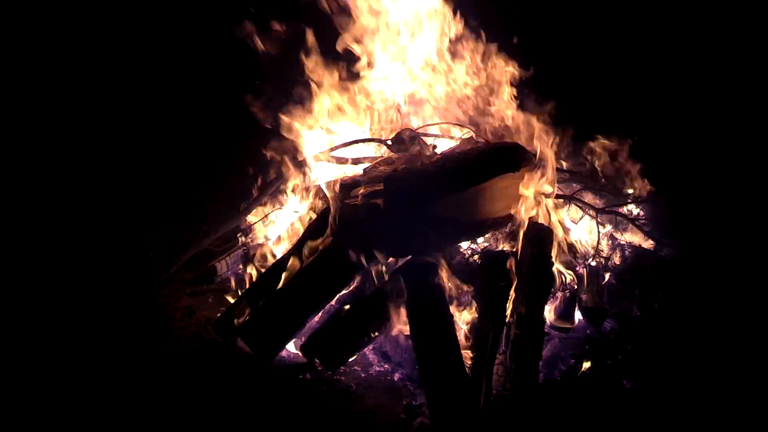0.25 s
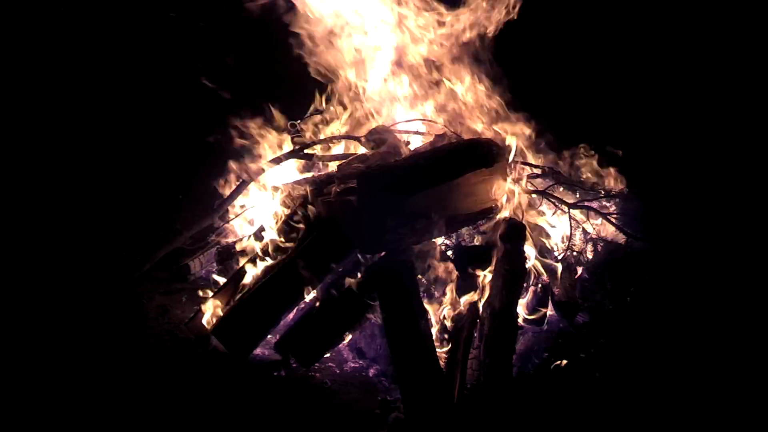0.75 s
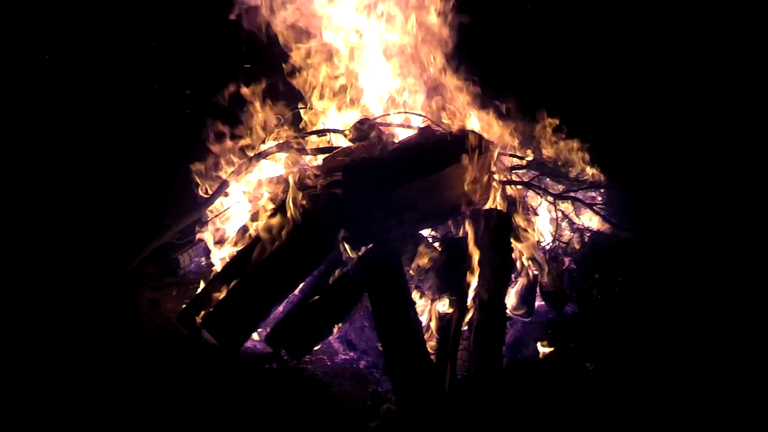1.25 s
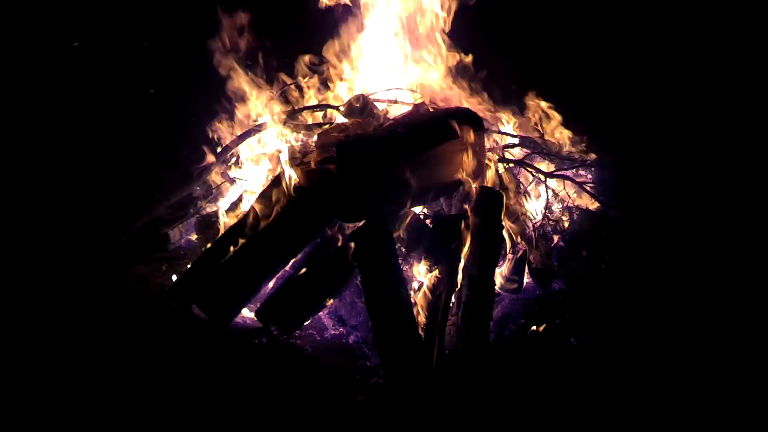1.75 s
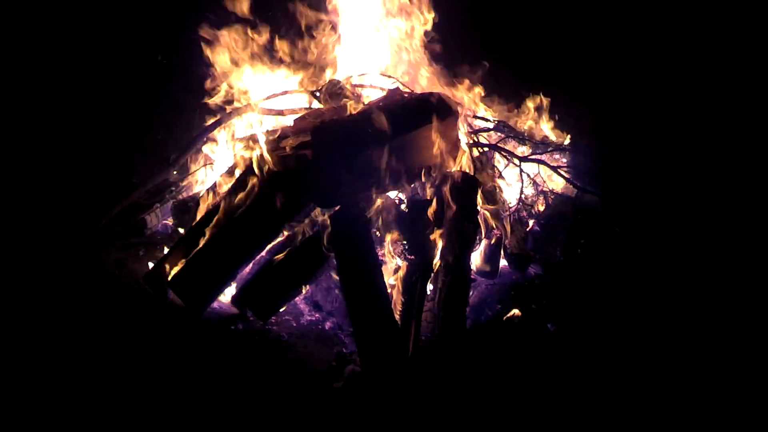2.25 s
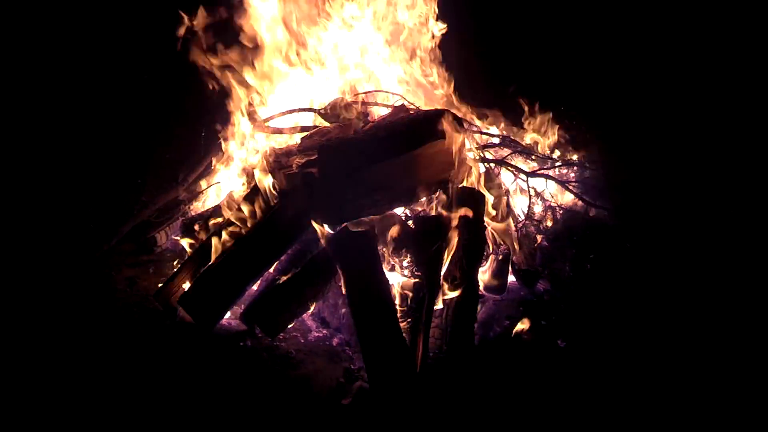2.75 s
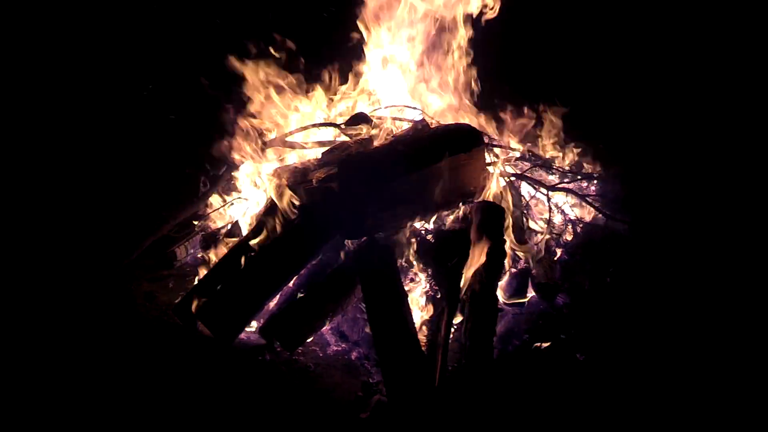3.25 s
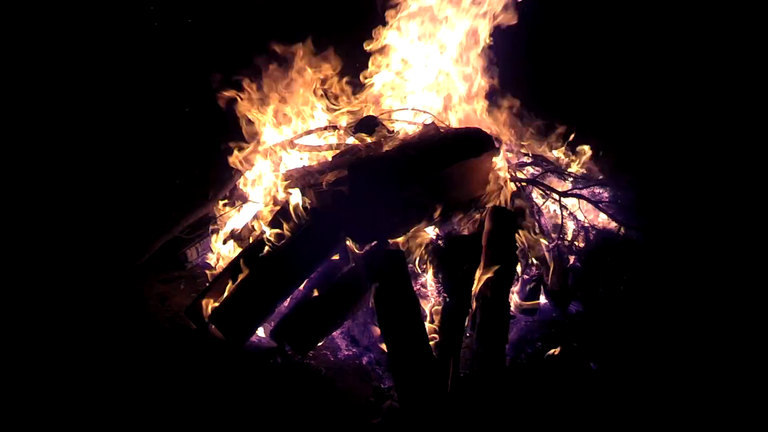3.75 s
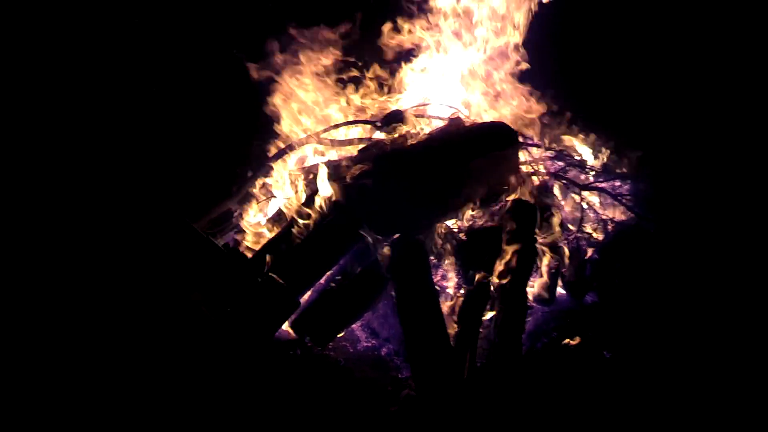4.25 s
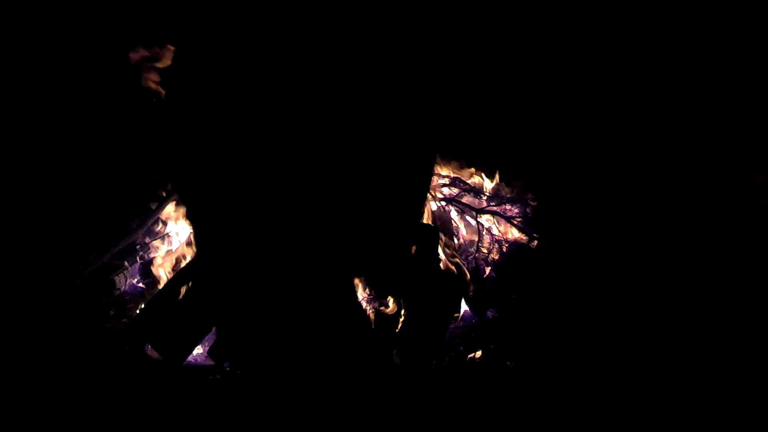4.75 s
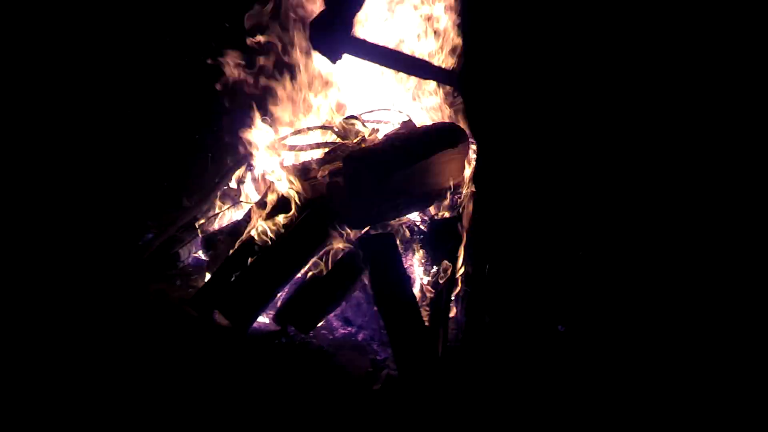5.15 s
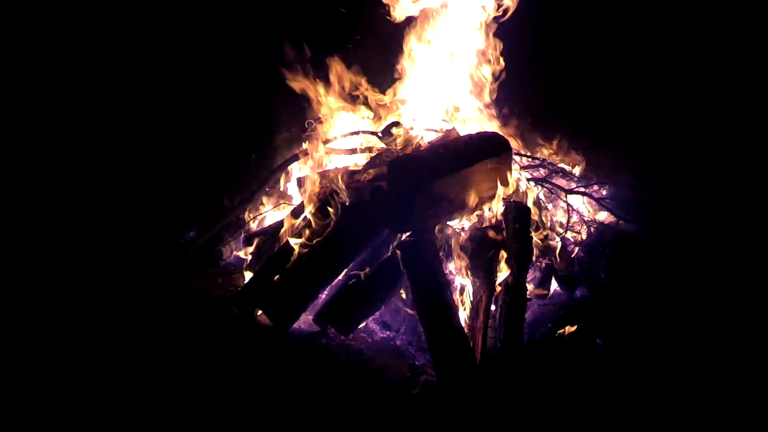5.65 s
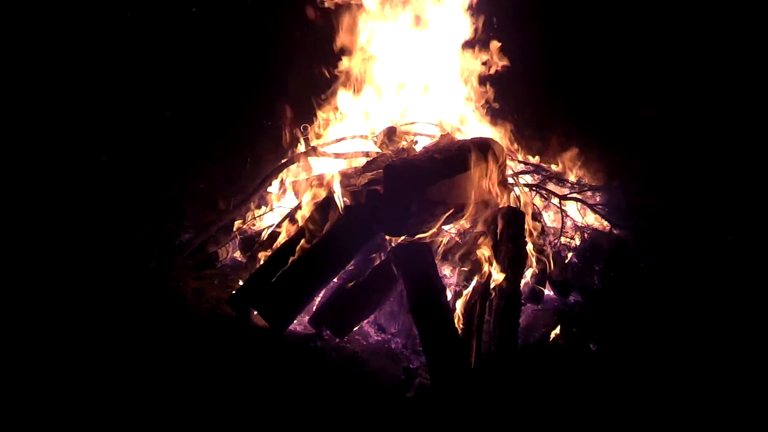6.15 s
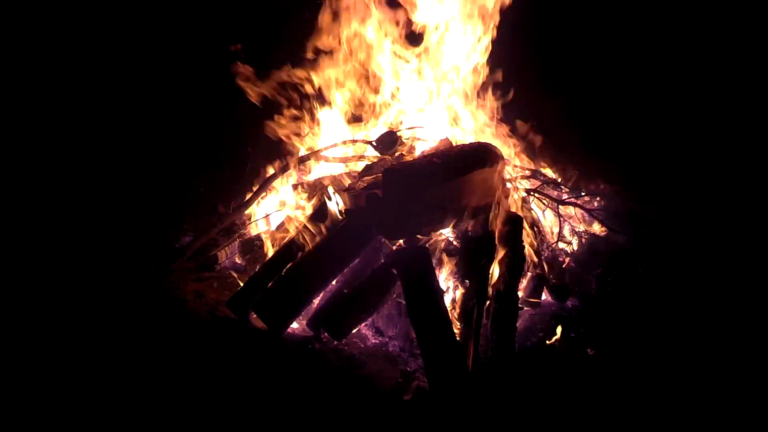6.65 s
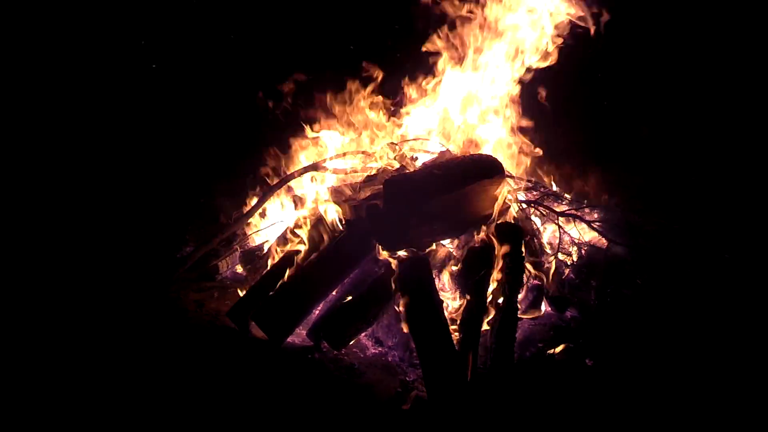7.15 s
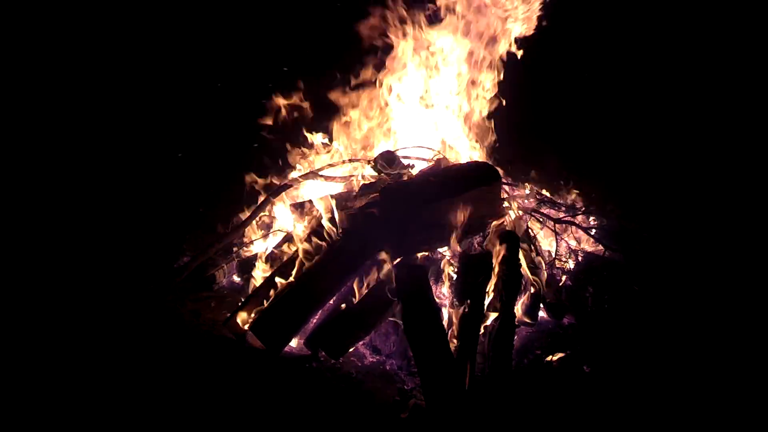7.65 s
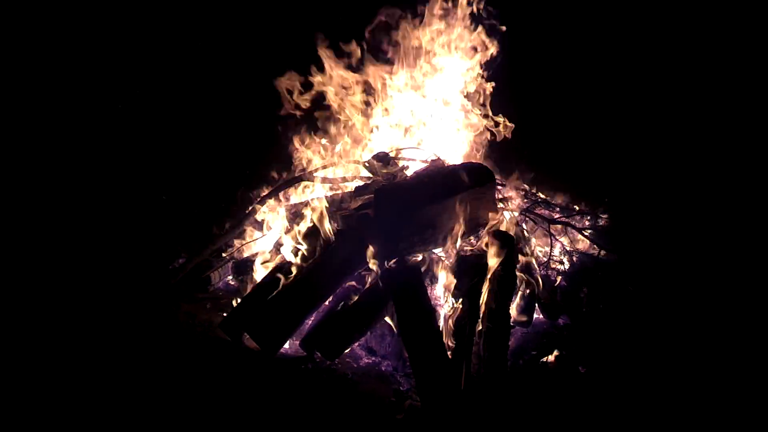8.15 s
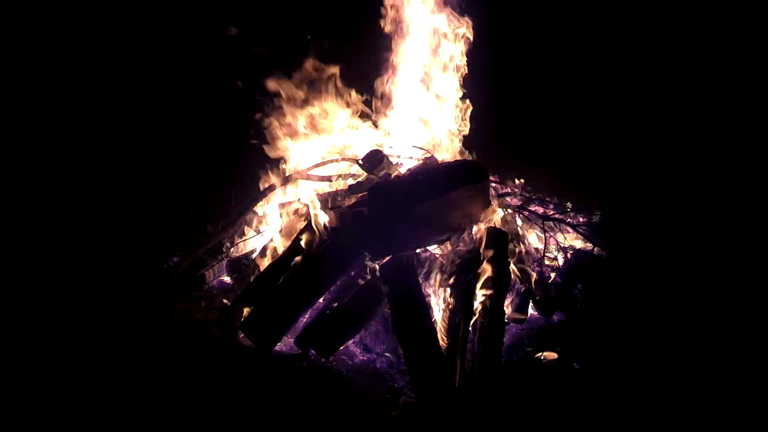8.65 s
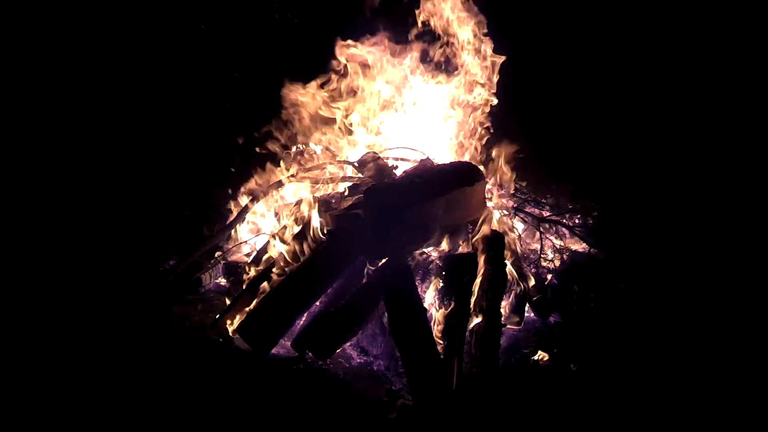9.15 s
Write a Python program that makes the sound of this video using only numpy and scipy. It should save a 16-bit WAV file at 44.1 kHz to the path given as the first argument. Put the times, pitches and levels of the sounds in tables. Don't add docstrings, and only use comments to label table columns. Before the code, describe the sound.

Close by a large outdoor wood fire at night, dense irregular crackle runs over hiss and a soft low roar. Branches crack and sap spits; a loud bang around three seconds briefly lowers the level. Paired bangs come near six seconds, then wind flutters heavily against one side of the stereo microphone around seven to eight, with crackling throughout.

```python
import sys
import numpy as np
from scipy import signal
from scipy.fft import next_fast_len
from scipy.io import wavfile

SR = 44100
rng = np.random.default_rng(int(sys.argv[2]) if len(sys.argv) > 2 else 0)


def voltage_ratio(decibels):
    exponent = np.asarray(decibels, float) / 20
    return 10 ** exponent


def log_audio(samples):
    frames = np.atleast_2d(samples).T
    limited = np.clip(frames, -1, 1)
    pcm = np.round(limited * 32767).astype(np.int16)
    wavfile.write(sys.argv[1], SR, pcm)


N = 413658


def at_time(rows):
    t_s, level_db = np.transpose(rows)
    return np.interp(np.arange(N) / SR, t_s, level_db)


def every_sample(slow):
    return np.interp(np.arange(N) / 40, np.arange(len(slow)), slow)


def rms_one(x):
    return x / np.sqrt(np.mean(x ** 2) + 1e-20)


def band(x, low_hz, high_hz):
    return signal.sosfilt(signal.butter(2, [low_hz, min(high_hz, SR * .45)], "band", fs=SR, output="sos"), x)


def split_filter(x, order, turn_hz, kind):
    return signal.sosfilt(signal.butter(order, turn_hz, kind, fs=SR, output="sos"), x)


def drift(rate):
    pole = np.exp(-80 * np.pi * rate / SR)
    settling = 2000
    white = rng.standard_normal(N // 40 + 2 + settling)
    return rms_one(signal.lfilter([1], [1, -2 * pole, pole * pole], white)[settling:])


def flicker_noise(spectrum, shared_db, own_db, rate):
    hz, level_db = np.transpose(spectrum)
    edges = hz[0] * 2 ** np.arange(0, np.log2(hz[-1] / hz[0]) + .01, .5)
    white = rng.standard_normal((2, N))
    together = drift(rate)
    out = 0
    for k, (low, high) in enumerate(zip(edges, edges[1:])):
        colour_db = np.interp(np.log(low * high) / 2, np.log(hz), level_db)
        gain = voltage_ratio(colour_db + shared_db * together + own_db * drift(rate))
        out = out + every_sample(gain) * band(white[k % 2], low, high)
    return rms_one(out)


def place(times, shapes):
    out = np.zeros(N + shapes.shape[1])
    starts = np.round(times * SR).astype(int)[:, None]
    np.add.at(out, starts + np.arange(shapes.shape[1]), shapes)
    return out[:N]


def ducking_db():
    # t/s, drop/dB
    ducks = [
        (1, 5),
        (3.002, 8),
        (6.109, 7),
        (8.449, 3),
    ]
    recovery_s, attack_s = 1.41, 0.0092
    t = np.arange(N) / SR
    gain_db = np.zeros(N)
    for start_s, drop_db in ducks:
        since = np.maximum(t - start_s, 0)
        gain_db -= drop_db * np.exp(-since / recovery_s) * (1 - np.exp(-since / attack_s))
    return gain_db


def flame_levels_db():
    # t/s, level/dB
    flames = [(0.0, -59), (0.52, -59), (0.98, -53), (1.3, -53.5), (1.56, -55.5), (2.3, -56), (2.6, -58.5),
              (2.9, -55), (3.5, -57.5), (3.9, -54.5), (4.7, -57), (5.1, -54.5), (5.21, -50.5),
              (5.33, -52.5), (6.1, -49), (7.0, -56), (8.4, -55), (9.38, -59.5)]
    vigour_db = at_time(flames)
    mean_db = vigour_db.mean()
    duck_db = ducking_db()
    return vigour_db + 1 + duck_db, mean_db + 0.99 * (vigour_db - mean_db) + duck_db


def wind_eddies():
    # t/s, peak level/dB,
    # sharpness level/dB
    puffs = [(2.388, -20.5, -15), (2.526, -26, -28), (2.664, -24.5, -13.5), (2.7, -19.5, -13),
             (2.734, -18, -11.5), (2.794, -22.5, -25), (4.554, -26, -10.5), (4.746, -27, -16),
             (4.97, -42, -16), (5.027, -19, -11.5), (5.185, -31, -32), (5.232, -22, -22), (5.354, -17, -35),
             (5.503, -26, -12), (6.452, -22, -34), (6.548, -37, -23.1), (6.699, -24.5, -23),
             (6.966, -28.5, -30), (8.32, -22.5, -20), (8.424, -23.5, -15), (8.657, -24, -18.5),
             (8.743, -27, -26), (8.8, -32, -24), (9.014, -32.5, -1.5), (9.04, -38, -17), (9.151, -19, -16),
             (9.354, -23, -16),
             (7.243, -23, -11.5), (7.318, -17.5, -21), (7.376, -22, -13.5), (7.439, -20.5, -15),
              (7.525, -20, -8), (7.586, -21.5, -37), (7.63, -22, -13.5), (7.733, -16.5, -44),
              (7.777, -21.5, -38), (7.83, -24, 0), (7.915, -20.5, -24), (7.975, -9.5, -35),
              (8.028, -22.5, -22), (8.091, -18.5, -22), (8.148, -14, -15.5), (8.209, -20.5, -21),
             (3.901, -46, 0), (4.005, -42, -30), (4.573, -28, -6.5), (4.602, -30, -25), (5.068, -26, -21),
             (5.3862, -22, -27), (6.392, -30, -20), (6.6033, -28, -26), (6.84, -22, -23), (7.021, -33, -31),
             (7.09, -28, -15), (7.262, -23, -15), (7.397, -29, -15), (7.498, -21.5, -14), (7.564, -30, -20),
             (7.651, -37, -22), (7.75, -21, -15), (8.366, -27, -11), (8.389, -23, -19), (8.547, -35, -28),
             (8.959, -45, -24)]
    centre_s, peak_db, sharp_db = np.transpose(puffs)
    t = np.arange(2600) / SR
    swirl = rng.standard_normal((len(centre_s), len(t))) * (t / 0.0078) ** 0.89 * np.exp(-t / 0.0098)
    swirl[:, 500] -= 18
    swing = band(band(swirl, 45, 230), 40, 280)
    core = np.exp(-((t - .012) / .0035) ** 2)
    edge = band(band(swirl * core, 200, 520), 180, 560)
    swing = swing / np.abs(swing).max(axis=1, keepdims=True)
    edge = edge / np.abs(edge).max(axis=1, keepdims=True)
    eddies = voltage_ratio(peak_db)[:, None] * (swing + voltage_ratio(sharp_db + 5.0)[:, None] * edge)
    return place(centre_s - .016, eddies)


def wind():
    # t/s, level/dB
    gusts = [(0.0, -22.5), (0.16, -55), (1.5, -69), (2.2, -57), (2.45, -38), (2.75, -26.5), (3.1, -72),
             (4.35, -61), (4.62, -30.5), (4.8, -60), (5.0, -27.5), (5.35, -35), (5.65, -41), (6.25, -52),
             (6.5, -38.5), (7.5, -38.5), (8.9, -38.5), (9.15, -29)]
    # f/Hz, level/dB per Hz
    buffet_spectrum = [(21, 18), (76, -1), (144, 4.5), (207, -22), (302, -4.5), (432, -32), (832, -25),
                       (1500, -67)]
    front_db = -14
    lumps = flicker_noise(buffet_spectrum, shared_db=6.0, own_db=4.0, rate=54)
    buffet = voltage_ratio(at_time(gusts) - 3.5) * np.array([voltage_ratio(front_db) * lumps[::-1], lumps])
    return buffet + wind_eddies() * [[voltage_ratio(front_db - 9.5)], [1]]


def rumble(roar_db):
    # f/Hz, level/dB per Hz
    rumble_spectrum = [(30, 3), (60, -15.5), (110, 4.5), (200, 3.5), (330, -5), (600, -84)]
    noise = flicker_noise(rumble_spectrum, shared_db=0.5, own_db=3.0, rate=4.05)
    return band(voltage_ratio(roar_db + 12.5) * noise, 61, 3000)


def roar(roar_db):
    # f/Hz, level/dB per Hz
    roar_spectrum = [(300, 3), (500, -2), (800, -1.5), (1500, -7), (2500, -1.5), (4000, -77)]
    return voltage_ratio(roar_db + 1.5) * flicker_noise(roar_spectrum, shared_db=2.0, own_db=2.5, rate=21.5)


def hiss(hiss_db):
    # f/Hz, level/dB per Hz
    hiss_spectrum = [(1500, 6), (2500, -12.5), (4500, 4.5), (7000, -11), (10000, -2), (13000, -10.5),
                     (17000, 8.5)]
    sizzle = flicker_noise(hiss_spectrum, shared_db=1.4, own_db=.8, rate=30)
    front = voltage_ratio(hiss_db - 11.0) * sizzle
    rear_own = voltage_ratio(hiss_db + 0.5) * band(sizzle[::-1], 4000, 20000)
    return front, rear_own


def shifts():
    # t/s, length/s, level/dB, low f/Hz, high f/Hz
    rubs = [
        (1.717, 0.028, -41, 200, 626),
        (3.888, 0.019, -41.5, 219, 540),
        (5.189, 0.076, -44, 607, 1770),
        (5.198, 0.062, -36.5, 230, 670),
        (6.995, 0.019, -34, 267, 400),
        (9.229, 0.014, -52, 606, 1200),
    ]
    out = np.zeros(N)
    t = np.arange(5000) / SR
    for start_s, length_s, level_db, low_hz, high_hz in rubs:
        clumps = voltage_ratio(5.0 * np.repeat(rng.standard_normal(50), 100))
        grit = rng.standard_normal(len(t)) * clumps
        swell = np.sin(np.pi * np.clip(t / length_s, 0, 1)) ** .5
        rub = rms_one(band(grit, low_hz, high_hz)) * swell
        out += place(np.array([start_s]), voltage_ratio(level_db) * rub[None])
    return out


def rings():
    # t/s, pitch f/Hz, level/dB, t60/ms
    modes = [(0.9630, 1440, -25, 7.7), (1.1325, 2900, -51, 5), (1.5802, 2900, -41, 5),
             (1.9146, 2900, -37, 6.5), (2.7983, 403, -31.5, 24), (2.8253, 2900, -17.5, 2),
             (2.9969, 2210, -11, 2.9), (3.2137, 910, -32.5, 6), (3.5538, 2900, -40, 6),
             (4.0855, 1040, -30.5, 6), (4.1413, 710, -30.5, 8.5), (5.5555, 950, -28, 7.1),
             (6.1046, 1840, -24.5, 5.5), (6.1049, 680, -10.5, 2.6), (6.4838, 1570, -23, 9.5),
             (6.5832, 1670, -32.5, 8.4), (8.0751, 1650, -26, 7.8), (8.7842, 1670, -29.5, 7.8),
             (9.1736, 1620, -49, 9), (9.2332, 865, -33, 13)]
    start_s, pitch_hz, level_db, t60_ms = np.transpose(modes)[:, :, None]
    t = np.arange(1300) / SR
    decay = voltage_ratio(level_db + 3.0 - 60000 * t / np.clip(t60_ms, 2, 30))
    return place(start_s[:, 0], decay * np.sin(2 * np.pi * pitch_hz * t))


def bursts(times, parts_db, length_s, crack, tail_db):
    # low f/Hz, high f/Hz, level/dB
    burst_bands = [
        (623, 2780, 0.5),
        (1764, 5040, 0.5),
        (6790, 14900, 1.5),
        (12100, 18500, -4.5),
    ]
    t = np.arange(500) / SR
    length_s = length_s[:, None]
    tear = (1 - np.exp(-t / (.1 * length_s))) * np.exp(-t / (.7 * length_s))
    envelope = tear + voltage_ratio(tail_db) * np.exp(-t / .003)
    tearing = rng.standard_normal((len(times), len(t))) * envelope
    tearing[:, 2:5] -= crack * .001 / length_s
    shapes = 0
    for (low_hz, high_hz, port_db), level_db in zip(burst_bands, parts_db):
        part = band(tearing, low_hz, high_hz)
        strength = np.sqrt((part ** 2).sum(axis=1, keepdims=True) / 44)
        shapes = shapes + part / strength * voltage_ratio(level_db + port_db)[:, None]
    return place(times, shapes)


def crackle(hiss_db):
    rate_per_s = every_sample(220 * voltage_ratio(4.5 * drift(6)))
    born = np.flatnonzero(rng.random(N) < rate_per_s / SR)
    chance = rng.standard_normal((8000, 7))[:len(born)].T
    spread = np.minimum(chance[5] ** 2 + chance[6] ** 2, 2.1)
    size_db = hiss_db[born] + 0.5 + 2.7 * spread
    colour_db = 2.4 * chance[:4] + [[-5.0], [-2.5], [-4.5], [-4.0]]
    colour_db[2] += 3 * np.exp(-born / SR / 1)
    length_s = .0004 * voltage_ratio(4.5 * chance[4])
    return bursts(born / SR, size_db + colour_db, length_s, crack=1.4, tail_db=-22)


def pops():
    # t/s, knock level/dB, snap level/dB, spit level/dB, length/ms
    bangs = [(0.0335, -35, -35, -25.5, 2.1), (0.9631, -39, -30.5, -27, 3), (1.1322, -34.5, -32, -24.5, 1.5),
             (1.581, -58, -23.5, -26, 1.9), (1.9145, -18, -18.5, -24.5, 2.3),
             (2.4285, -42, -30.5, -24, 0.7), (2.7977, -27, -44, -30.5, 7.4), (2.825, -35, -36, -29, 4.1),
             (2.9967, -8, -12, -50, 0.63), (3.5536, -38, -31, -26.5, 1.6), (4.0856, -29, -23, -24, 1.1),
             (4.1403, -30.5, -47, -25.5, 2.7), (5.5435, -37, -28, -58, 1.8),
             (5.5553, -33, -30, -27.5, 0.41), (6.0978, -27, -31, -31, 4.7), (6.1044, -17, -14.5, -21, 1.1),
             (6.4836, -53, -54, -28, 0.67), (6.583, -31, -19.5, -25.5, 0.3),
             (6.8166, -38, -24.5, -24.5, 0.24), (8.0747, -31, -21.5, -33, 0.84),
             (8.4446, -36, -26, -24, 0.29), (8.784, -30.5, -22, -25, 0.16), (9.1731, -50, -26, -25.5, 0.38),
             (9.233, -30.5, -36, -31, 2.6)]
    # t/s, level/dB, length/ms
    thuds = [(0.3095, -36.5, 6.4), (1.7236, -56, 1.4), (2.9354, -35, 0.82), (3.2135, -37, 2),
             (5.3984, -36.5, 0.37), (5.439, -34.5, 0.74), (5.6816, -31, 1.8), (6.7556, -32.5, 3.9),
             (6.9045, -35.5, 1.6), (7.218, -57, 2.7), (7.458, -40, 1.7), (7.495, -48, 2.6),
             (7.877, -58, 0.92), (8.147, -34, 0.87), (8.6927, -39.5, 0.3), (8.9734, -34.5, 1.4),
             (9.2286, -45, 7.4)]
    # t/s, level/dB, length/ms
    cracks = [(0.4436, -29, 2.3), (0.473, -34.5, 4.6), (0.5453, -38, 1.5), (0.6482, -34.5, 2.1),
              (0.698, -33.5, 0.82), (0.7307, -38, 3.4), (0.9408, -30, 1.8), (0.9703, -30.5, 1.2),
              (1.027, -38, 2.1), (1.2546, -35, 3.4), (1.2694, -35, 1.5), (1.2983, -35, 2.1),
              (1.3858, -38.5, 0.88), (1.5737, -32.5, 5), (2.6378, -30.5, 0.99), (2.749, -36, 2.7),
              (2.8712, -32, 7.2), (3.2753, -36.5, 1.1), (6.415, -32, 8.1), (7.0042, -33, 0.6),
              (7.1498, -34.5, 0.75), (7.178, -40.5, 0.74), (7.6868, -32, 0.78), (8.2715, -37, 0.58),
              (9.1666, -32.5, 4.1)]
    # t/s, level/dB, length/ms
    snaps = [(0.1127, -33.5, 1.2), (0.1687, -36.5, 7), (0.208, -40.5, 2.9), (0.285, -43, 2.4),
             (0.6906, -38, 4.1), (0.84, -40, 2.9), (0.8866, -38, 1.8), (0.9056, -34, 1.6),
             (1.221, -35, 1.9), (1.6424, -36.5, 1.6), (1.9064, -35, 3), (2.0026, -39.5, 2.3),
             (2.1798, -39, 2.1), (2.3951, -32.5, 5.4), (2.577, -37, 6.8), (2.803, -30.5, 5.4),
             (3.4288, -43.5, 0.73), (3.6008, -42, 2), (3.9541, -35, 2.4), (4.4348, -36, 1.2),
             (5.2021, -33, 5.7), (5.3217, -33, 1.2), (5.7335, -35.5, 2.5), (6.268, -38.5, 9),
             (7.3942, -26.5, 0.87), (7.443, -33.5, 1.3), (8.3173, -31, 0.39), (8.4373, -32.5, 2.1),
             (9.357, -30.5, 0.22)]
    # t/s, level/dB,
    # length/ms
    spits = [(0.0665, -30, 0.99), (0.382, -34.5, 2.7), (0.7208, -31.5, 4.6), (0.9908, -35, 2.1),
             (1.602, -34, 0.99), (1.7526, -34, 1), (1.8456, -33.5, 2.3), (2.1151, -28.5, 1.5),
             (2.5608, -35.5, 0.25), (2.9149, -34.5, 1.3), (3.0035, -46, 0.44), (3.0832, -38, 0.79),
             (3.2206, -29.5, 0.95), (4.2217, -33, 2.7), (4.4827, -36.5, 1.8), (4.929, -49, 1.8),
             (5.6023, -34.5, 1.1), (5.8836, -33, 0.56), (5.9934, -30.5, 4.9), (6.0429, -30.5, 2.6),
             (6.0875, -32, 0.81), (6.6346, -34.5, 3.7), (7.118, -36, 1.7), (7.3985, -33, 0.4),
             (7.564, -29.5, 0.36), (7.7677, -31, 0.74), (8.5673, -38.5, 5.7), (8.8125, -33.5, 6.6),
             (8.817, -32, 0.37), (9.1947, -31.5, 1.4), (9.3523, -37, 2.7)]
    # t/s, level/dB, length/ms
    ticks = [
        (4.6484, -33, 1),
        (4.679, -36, 1.5),
        (4.785, -52, 1.5),
        (4.8486, -32.5, 1.9),
        (4.89, -46, 1.2),
        (4.9295, -29.5, 3.4),
    ]
    # t/s, level/dB
    embers = [(0.254, -36.5), (0.637, -33), (0.767, -33), (1.257, -49), (1.4427, -34), (1.5404, -36),
              (1.657, -39), (1.7835, -28.5), (2.1493, -34), (2.2905, -35), (2.3764, -31.5), (2.6215, -35),
              (2.9073, -35), (2.969, -32.5), (3.771, -36.5), (4.047, -35), (4.116, -39), (4.4643, -35.5),
              (5.332, -28.5), (5.406, -36.5), (5.702, -29), (6.022, -28.5), (6.438, -29.5), (7.531, -36),
              (7.8266, -35), (7.9505, -54), (8.1744, -36), (9.109, -38.5)]
    # t/s, level/dB
    knocks = [(0.0509, -33.5), (0.208, -42), (0.2846, -39), (0.309, -39), (0.382, -48), (0.4756, -50),
              (0.583, -33.5), (0.6593, -38.5), (0.7224, -34), (0.754, -49), (0.84, -36), (0.9773, -38.6),
              (0.985, -49), (0.992, -49), (1.2674, -39), (1.3365, -38), (1.3927, -39.5), (1.4192, -39),
              (1.451, -43), (1.7238, -53), (1.778, -40.5), (1.8463, -41), (1.9065, -38), (2.329, -38.5),
              (2.3983, -42), (2.874, -35.5), (3.3826, -42), (3.6894, -40.5), (3.848, -38.5),
              (3.9361, -42.5), (4.2217, -38), (4.8899, -39.5), (4.929, -44), (5.114, -39.5), (5.189, -43),
              (5.534, -37), (5.58, -43), (5.6613, -38), (5.7444, -38), (5.8624, -32.5), (6.0325, -38),
              (6.1603, -42), (6.2708, -53), (6.2932, -58), (6.308, -36), (6.321, -37), (6.4485, -42),
              (6.4839, -27.5), (6.7436, -39), (7.0567, -55), (7.1636, -34.5), (7.262, -39.5), (7.493, -54),
              (7.817, -41.5), (7.8766, -35), (8.366, -36), (8.3772, -35.5), (8.388, -34.5), (8.8662, -43.5),
              (9.174, -40)]
    # t/s, level/dB
    taps = [(0.7324, -36), (0.937, -32), (0.991, -36), (1.7227, -37), (6.0, -47), (6.0277, -39),
            (6.07, -38), (7.0562, -42.5), (7.4939, -41), (7.9668, -45), (8.0461, -46), (9.1811, -45)]
    # t/s, level/dB
    cricks = [(0.1152, -31), (0.1699, -45), (0.232, -41.9), (0.2375, -48), (0.2898, -36.5), (0.4912, -40.5),
              (0.664, -38), (0.8858, -39), (0.938, -43), (0.9618, -33), (1.124, -37), (1.235, -37),
              (1.6575, -45), (1.8024, -40.5), (2.6061, -42), (2.7343, -40), (2.852, -33.5), (2.908, -33),
              (3.46, -43), (3.4714, -43.5), (3.8092, -39), (3.951, -35.5), (3.962, -37), (4.3998, -40),
              (4.6754, -39), (5.2349, -35.5), (5.4361, -46), (5.7297, -29), (5.8717, -39), (5.9837, -35.5),
              (6.063, -29), (6.2211, -40), (6.2734, -34), (6.3786, -35), (6.4115, -37), (6.4209, -33.5),
              (6.5723, -42.5), (6.6872, -42), (6.729, -39), (7.1365, -35), (7.4516, -41), (7.949, -50),
              (7.9871, -44), (8.1414, -44), (8.1737, -41), (8.3514, -37.5), (8.424, -36), (8.4314, -33),
              (8.451, -49), (8.5339, -40.5), (8.7604, -40), (8.7691, -38), (8.8205, -37), (8.8327, -38),
              (9.0604, -39.5), (9.229, -38), (9.348, -41)]
    # t/s, level/dB
    specks = [(0.0663, -22.5), (0.5897, -37.5), (0.864, -41), (0.977, -40), (1.0174, -33), (1.257, -40),
              (1.4188, -44), (1.6766, -40), (1.795, -37), (1.83, -41), (1.8396, -32), (1.9437, -36),
              (2.0194, -42), (2.2823, -35), (2.4373, -34), (2.5719, -37), (2.7049, -37), (3.4922, -41),
              (4.6616, -52), (4.89, -43.5), (5.1528, -35), (5.8012, -34), (5.8107, -39), (5.9183, -42),
              (5.965, -40), (5.978, -36), (6.0333, -33), (6.32, -37), (7.2476, -36), (7.815, -35),
              (7.8964, -43), (7.987, -36), (8.31, -41), (8.3965, -31.5), (8.4511, -38), (8.6402, -34),
              (8.764, -40), (9.2437, -44)]

    def equally_short(rows, length_ms):
        return [(*row, length_ms) for row in rows]

    # knock, snap, spit and fizz level/dB
    kinds = [(thuds, (0.5, -2.5, -5, -19)),
             (cracks, (-1.7, -7, 0, -15.5)),
             (snaps, (-11.5, 1.5, 0.5, -7)),
             (spits, (-14.5, -3.5, 2, 1)),
             (ticks, (-19, -20, -8.5, 7)),
             (equally_short(embers, 1.4), (-10, -8, -3.5, -4)),
             (equally_short(knocks + taps, 1), (0, -9, -7, -39)),
             (equally_short(cricks, 1), (-15.5, -3.5, -1, -4.5)),
             (equally_short(specks, 1), (-14, -11.5, -3.5, -6))]
    fizz_db = -4
    events = [(s, knock, snap, spit, spit + fizz_db, ms) for s, knock, snap, spit, ms in bangs]
    for rows, colour_db in kinds:
        events += [(s, *np.add(level_db, colour_db), ms) for s, level_db, ms in rows]
    times, *parts_db, length_ms = np.transpose(events)
    length_s = np.clip(length_ms, .3, 6) / 1000
    return bursts(times, parts_db, length_s, crack=2.17, tail_db=-13)


def rear_port(fire, low, top):
    shaded = voltage_ratio(-7.5) * split_filter(fire, 4, 2900, "low")
    bounces = rng.standard_normal(90) * np.exp(-np.arange(90) / 25) / 3.5
    scattered = band(signal.lfilter(bounces, 1, fire), 2770, 19200)
    scatter = voltage_ratio(-10.5) * every_sample(drift(23)) * scattered
    phase = 3 * every_sample(drift(27))
    turned = np.real(signal.hilbert(top, next_fast_len(N))[:N] * np.exp(1j * phase))
    leak = voltage_ratio(-23) * band(low, 4260, 17000)
    return shaded + scatter + turned + leak


def scene():
    hiss_db, roar_db = flame_levels_db()
    front_hiss, rear_hiss = hiss(hiss_db)
    bass = rumble(roar_db)
    fire = front_hiss + roar(roar_db) + shifts() + rings() + crackle(hiss_db) + pops()
    top_turn_hz = 11300
    low = split_filter(fire, 6, top_turn_hz, "low")
    top = split_filter(fire, 6, top_turn_hz, "high")
    front = low + voltage_ratio(-1) * top + bass
    rear = rear_port(fire, low, top) + rear_hiss + voltage_ratio(-1.5) * bass
    return np.array([front, rear]) + wind()


def low_pass(x):
    return signal.sosfilt(signal.butter(12, 17130, fs=SR, output="sos"), x)


def record(dry):
    lag = 16
    late = np.pad(dry, ((0, 0), (lag, 0)))[::-1, :N]
    x = dry - late + voltage_ratio(-80) * rng.standard_normal(dry.shape)
    x = .8 * np.tanh(x / .8)
    x = split_filter(x, 2, 75, "high")
    x = x - 0.48 * band(x, 9160, 14500)
    edges = rng.standard_normal((2, 40)) * np.exp(-np.arange(40) / 12) / 2.5
    swaying = np.array([every_sample(drift(40)) * signal.lfilter(taps, 1, v) for taps, v in zip(edges, x)])
    x = x + voltage_ratio(-17.0) * band(swaying, 4600, 18000)
    x = x + voltage_ratio(-56.0) * band(rng.standard_normal(x.shape), 18, 45)
    x = signal.sosfilt(signal.ellip(8, 1, 60, 16950, fs=SR, output="sos"), x)
    return low_pass(x)


dry = scene()
out = record(dry)
log_audio(out)
```